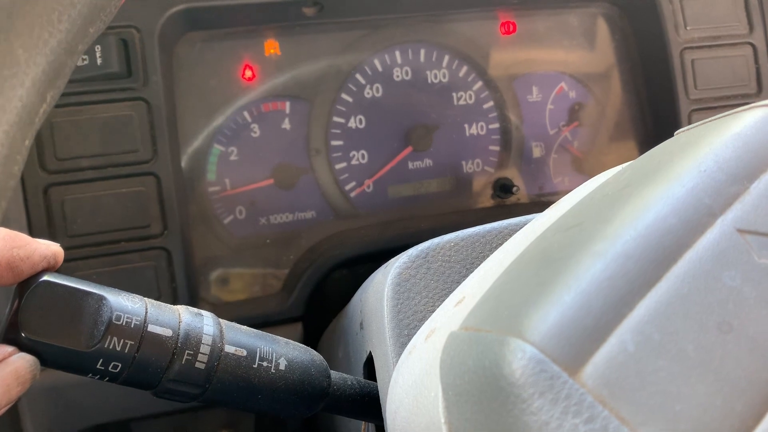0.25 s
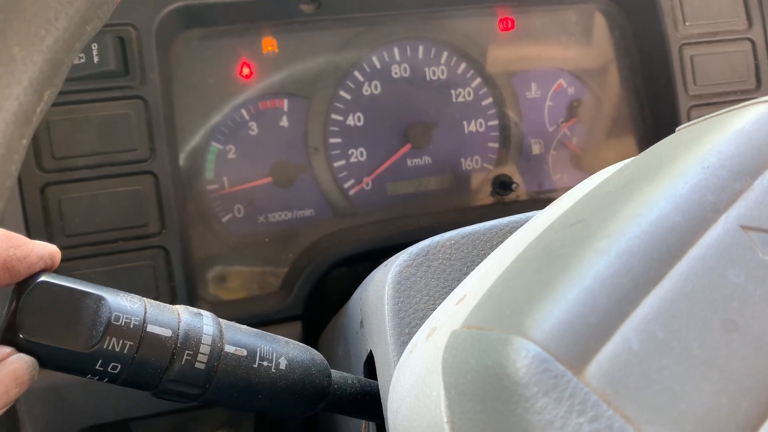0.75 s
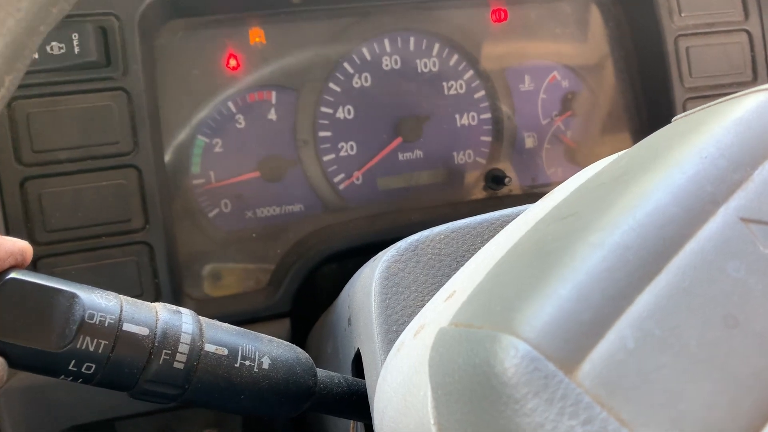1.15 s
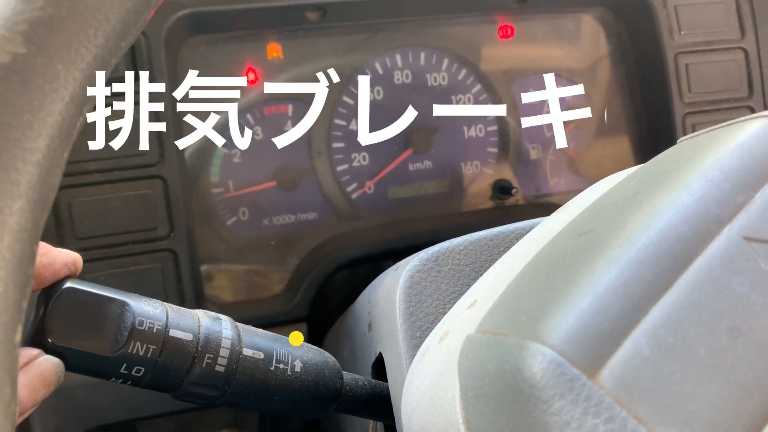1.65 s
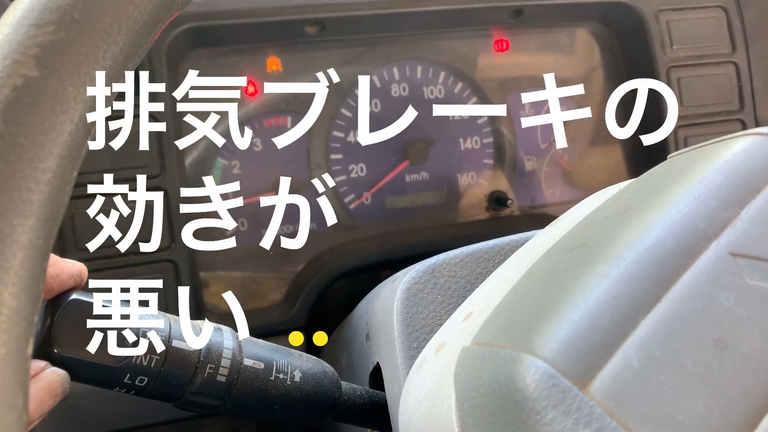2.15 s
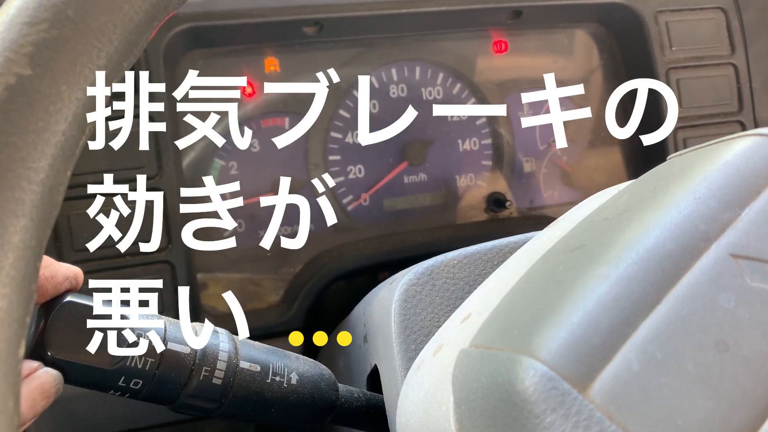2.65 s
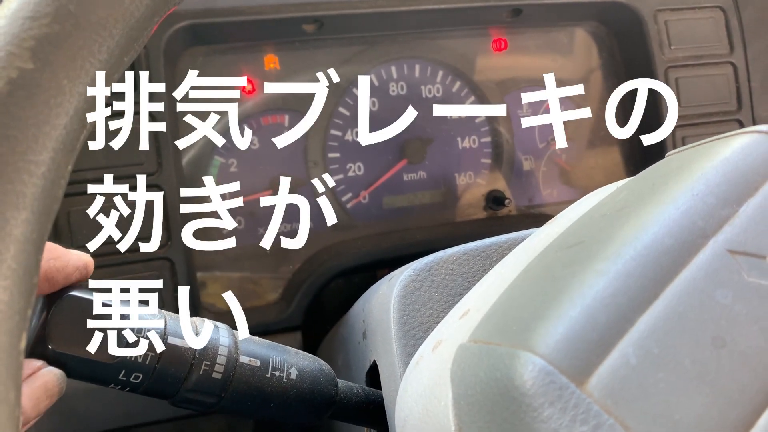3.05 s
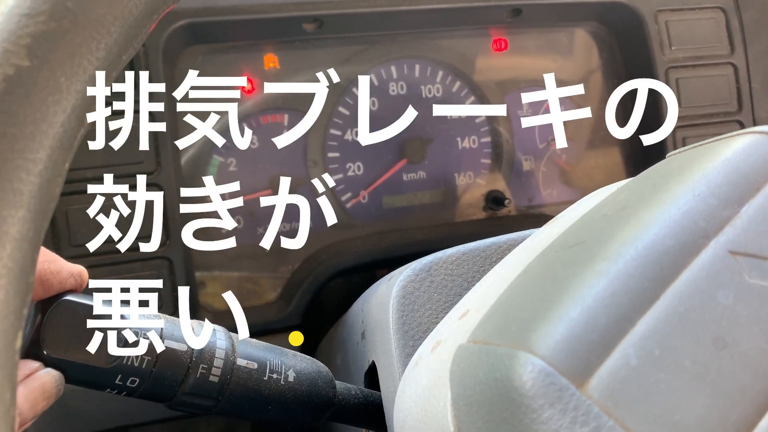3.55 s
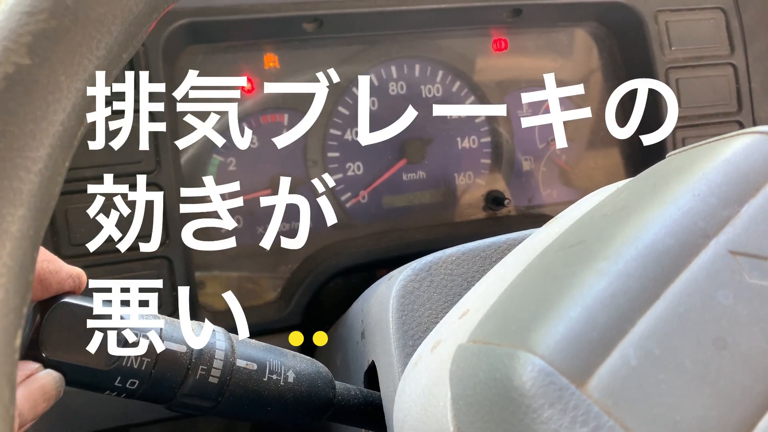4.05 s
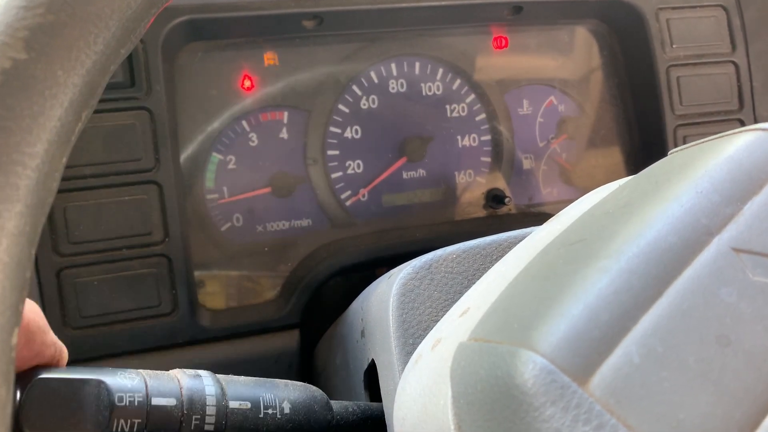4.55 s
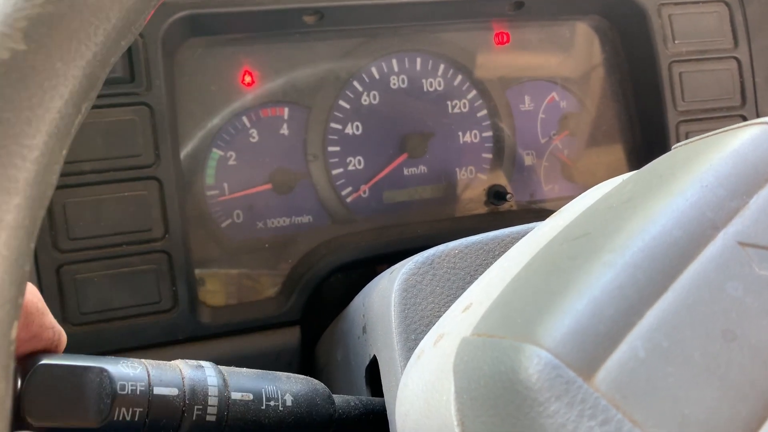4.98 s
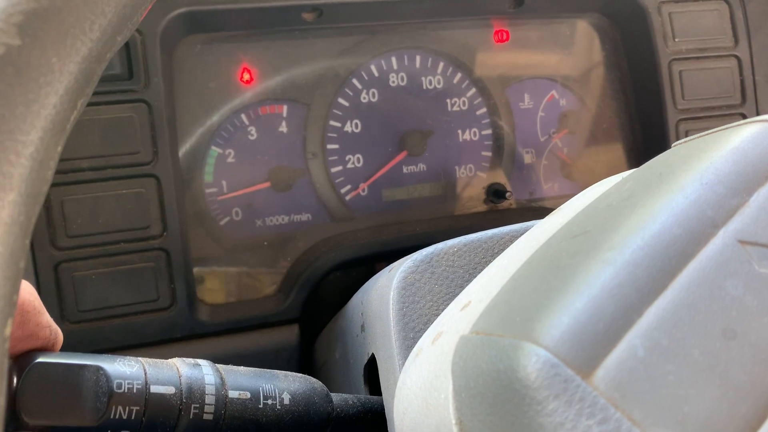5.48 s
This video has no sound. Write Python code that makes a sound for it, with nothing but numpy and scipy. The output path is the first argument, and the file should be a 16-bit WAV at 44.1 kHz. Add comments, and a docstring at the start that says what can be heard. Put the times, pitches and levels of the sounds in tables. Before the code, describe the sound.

Inside a parked diesel truck cab, the engine idles with its exhaust brake shut: a steady low boom, knocking, clatter and a thin whistling air leak. One faint tap comes midway. Late on, a quick burst of compressed air vents, the boom and hiss fall away, and the engine eases to a slower, softer, slightly crackling idle. Close stereo microphone in the cab.

```python
"""Diesel truck letting go of its exhaust brake

A four-cylinder diesel idles, heard in its cab, with the exhaust brake shut: tones tied to the firings
boom, filtered clicks knock, shaped noise clatters and steady tones hum. Noise hisses and whistles as
air at the brake valve. A faint tap, then the air vents in a puff and the brake opens: boom and hiss
die away and the engine, with a sharper crack, settles to a slower, softer idle."""
import sys
import numpy as np
from scipy import signal
from scipy.fft import rfft, irfft, next_fast_len
from scipy.io import wavfile
from scipy.ndimage import uniform_filter1d

SR = 44100
rng = np.random.default_rng(int(sys.argv[2]) if len(sys.argv) > 2 else 0)


def persist_wave(psi):
    """Save psi, clipped to +-1, as 16-bit WAV."""
    counts = np.round(np.clip(psi, -1, 1) * 32767).astype(np.int16)
    wavfile.write(sys.argv[1], SR, np.atleast_2d(counts).T)


N = 252252

# Block and cab panels that ring: (pitch [Hz], width of one filter pass [Hz],
# level of a knock harmonic there with the brake shut [dB rms])
PANELS = [(358, 50, -48), (410, 50, -49), (442, 36, -45), (498, 30, -56), (575, 40, -48), (615, 56, -48.5),
          (716, 30, -48.5), (878, 40, -52), (1010, 110, -61), (1135, 60, -61), (1300, 70, -64),
          (1485, 50, -59), (1570, 50, -58), (1800, 180, -62), (2520, 130, -72)]

FIRST_S = 0.0192  # first firing
BRAKED_HZ, FREE_HZ = 27.515, 23.6  # firings per second, brake shut and free idle
OPEN_S = 4.605  # the brake flap starts to open
FLAP_S, SETTLE_S, PIPE_S = 0.028, 0.14, 0.12  # time constants: flap, governor, pipe emptying
SAG_PER_S = 0.031  # the back pressure slackens slowly while the brake is held
STRONG_TURN = 1.6  # place in the four-firing cycle where the beat swells most (firing gaps)

VENT_S, ATTACK_S, HOLD_S = 4.546, 0.021, 0.03  # puff: start, rise of the hiss, full flow
WHISTLE_ATTACK_S = 0.028  # the whistle builds more slowly
LEAK_DB, PUFF_DB, REST_DB = -42, -33.5, -64.5  # rough hiss level: leak, full puff, empty line
LEAK_WHISTLE_DB, PUFF_WHISTLE_DB = -47, -28  # rough whistle level: leak, full puff
HISS_FALL_DB_S, WHISTLE_FALL_DB_S = 170, 152  # release of the puff (dB per s)
DRAIN_DB_S2 = 157  # the leak fades ever faster as the line empties (dB per s squared)

CRACK_HZ, CRACK_WIDTH_HZ = 2950, 280
CRACK_DB = -77  # level of a crack harmonic at the settled idle


def amp(db):
    """Gain of a level in dB."""
    return 10 ** (np.asarray(db) / 20)


def read(points, hz):
    """Value of a spectrum table, in straight lines on a log-frequency axis."""
    f, value = np.transpose(points)
    return np.interp(np.log(hz + 1), np.log(f + 1), value)


def noise(points):
    """Two unrelated noises with a density given in dB per Hz."""
    gain = amp(read(points, np.fft.rfftfreq(N, 1 / SR))) * np.sqrt(SR / 2)
    return irfft(rfft(rng.standard_normal((2, N))) * gain, N)


def resonate(x, hz, width):
    """Ringing at one pitch: a resonance with a gain of about 1 at its centre."""
    r = np.exp(-np.pi * width / SR)
    turn = np.exp(2j * np.pi * hz / SR)
    return 2 * signal.lfilter([1 - r], [1, -r * turn], x).real


def wobble(seconds):
    """Slow random drift of rms 1: noise averaged twice over the given time."""
    x = rng.standard_normal(N)
    for _ in range(2):
        x = uniform_filter1d(x, int(seconds * SR))
    return x / x.std()


def firings(rate, scatter_db, delay, spread_s, order=0):
    """One soft click per firing, scaled to about rms 1 per low harmonic; delay in firing gaps."""
    # Relative strength in firing order: (strength [dB])
    cylinder_db = [-5.5, -3, -11, 1]
    at = np.flatnonzero(np.diff(np.floor(np.cumsum(rate) / SR - delay)))
    chance = rng.standard_normal((len(at), 2))
    strength_db = np.resize(np.roll(cylinder_db, order), len(at)) + scatter_db * chance[:, 0]
    late = (spread_s * SR * chance[:, 1]).astype(int)
    clicks = np.zeros(N)
    clicks[np.clip(at + late, 0, N - 1)] = amp(strength_db) * SR / rate[at] / np.sqrt(2)
    return signal.sosfilt(signal.butter(4, 3200, fs=SR, output="sos"), clicks)


def controls():
    """Firing rate, brake closure and pipe pressure: the flap snaps open, the speed eases down."""
    t = np.arange(N) / SR
    since = np.maximum(t - OPEN_S, 0)
    held = 1 - SAG_PER_S * t
    # settles without overshoot
    rate = FREE_HZ + (BRAKED_HZ - FREE_HZ) * (1 + since / SETTLE_S) * np.exp(-since / SETTLE_S)
    shut = held * np.exp(-since / FLAP_S)
    pressure = held * np.exp(-(since / PIPE_S) ** 2)
    return rate, shut, pressure


def beat(turns, shut):
    """Low exhaust tones locked to the firings; unequal cylinders add fractions of the firing rate."""
    # Tones: (multiple of the firing rate, level with the brake shut [dB rms],
    # level over its group in swell_points with the brake open [dB])
    tones = [(1, -36.5, -14), (2, -20.2, 0), (3, -34, 0), (4, -39.5, -12), (1.25, -60, -30),
             (1.5, -51, -30), (1.75, -41.5, -17), (2.25, -50, -19), (2.5, -48, -17), (2.75, -50, -20),
             (3.25, -58, -25), (3.5, -58, -25), (3.75, -57, -25), (4.25, -56, -10), (4.5, -57, -12),
             (4.75, -57, -10), (5, -46, -1), (5.25, -48, -8), (5.5, -55, -3), (5.75, -58, -6), (6, -48, -1),
             (6.25, -53, -14), (6.5, -55, -14), (6.75, -53, -12), (7, -49, -4), (7.25, -46, -12),
             (7.5, -52, -12), (7.75, -51, -10), (8, -45, -3), (8.25, -53, -11), (8.5, -56, -11),
             (9, -60, -12), (10, -52, -12), (11, -49, -12), (12, -45, -12)]
    # With the brake open the beat swells and dips unevenly:
    # (time [s], low group [dB rms], middle group [dB rms], high group [dB rms])
    swell_points = [(4.64, -40, -43, -44), (4.7, -33, -37, -41), (4.77, -36, -41, -45),
                    (4.83, -30, -37, -49), (4.885, -41, -34, -49), (4.94, -28, -36, -35),
                    (4.985, -39, -40, -47), (5.08, -31, -31, -38), (5.16, -35, -34, -47),
                    (5.21, -41, -34, -43), (5.27, -26, -33, -36), (5.325, -36, -34, -48),
                    (5.385, -29, -37, -41), (5.45, -31, -37, -45), (5.52, -29, -32, -43),
                    (5.565, -37, -38, -51), (5.615, -28, -35, -40), (5.72, -31, -37, -45)]
    s, *levels = np.transpose(swell_points)
    t = np.arange(N) / SR
    low_db, middle_db, high_db = (uniform_filter1d(np.interp(t, s, db), SR // 50) for db in levels)
    out = np.zeros(N)
    for multiple, shut_db, open_db in tones:
        waver_db = (0.6 - 0.5 * shut) * wobble(0.063)  # steadier with the brake shut
        swell_db = low_db if multiple < 2.9 else middle_db if multiple < 4.1 else high_db
        gain = shut * amp(shut_db) + (1 - shut) * amp(open_db + swell_db)
        start = (round(multiple) - multiple) * STRONG_TURN
        if multiple > 3.5:
            start += multiple / 2  # higher tones crest midway between firings
        elif multiple < 3.5 and multiple != 2:
            start += 0.13  # tones beside the cab's boom run ahead
        if multiple > 3 and multiple % 1 > 0:
            start += rng.random()  # the higher fractions keep no common step
        out += np.sqrt(2) * gain * amp(waver_db) * np.cos(2 * np.pi * (multiple * turns + start))
    return out


def hums():
    """Steady tones that keep their pitch while their level drifts."""
    # Tones: (pitch [Hz], level before the drift [dB rms])
    steady_tones = [(58.45, -53.5), (70.6, -44.5), (128.45, -52)]
    t, out = np.arange(N) / SR, np.zeros(N)
    for hz, db in steady_tones:
        level = np.sqrt(2) * amp(db + 0.99 * wobble(0.2))
        out += level * np.sin(2 * np.pi * (hz * t + rng.random()))
    return out


def knocks(rate, pressure):
    """Each combustion blow sets the panels ringing, more softly as the pipe pressure falls."""
    main = firings(rate, 0.8, delay=0.7, spread_s=0.00005)
    # the higher panels ring later and sit nearer another cylinder
    block = firings(rate, 0.8, delay=0.87, spread_s=0.00005, order=2)
    # valves seat about midway between firings
    valves = firings(rate, 2.0, delay=0.21, spread_s=0.0001)
    eased = amp(-10.0 * (1 - pressure))
    out = np.zeros((2, N))
    for hz, width, db in PANELS:
        blow = block if hz > 520 else main
        if hz > 700:
            blow = blow + 0.44 * valves
        ring = amp(db) * resonate(resonate(blow * eased, hz, width), hz, width)
        # a blow reaches each of the two spots by its own path, under 2 ms long
        for spot, lag in enumerate(rng.integers(0, SR // 500, 2)):
            out[spot] += np.roll(ring, lag)
    return out


def clatter(turns, pressure):
    """Mechanical noise and trapped-gas noise, coloured by the panels and pulsing with the firings."""
    # Mechanical noise before panels and pulsing: (frequency [Hz], density [dB per Hz])
    mechanical = [(30, -72), (50, -63), (70, -67), (85, -71), (140, -64), (200, -68), (235, -76),
                  (270, -71), (450, -71), (620, -78), (1250, -75.5), (1380, -77.5), (1500, -75.5),
                  (1700, -77), (1850, -78), (2400, -81), (4300, -83), (5300, -88.5), (6500, -89),
                  (8700, -96.5), (13000, -102), (16000, -116)]
    # Trapped gas at full pressure, before panels and pulsing: (frequency [Hz], density [dB per Hz])
    trapped_gas = [(35, -86), (55, -55), (72, -53), (100, -75.5), (200, -54.5), (290, -72.5), (400, -71.5),
                   (550, -71), (750, -74), (900, -71.5), (1500, -91), (2500, -95.5), (4000, -93.5)]
    chuff = amp(1.7 * np.cos(2 * np.pi * (turns - 0.38)))  # the gas surges once a firing
    rattle = noise(mechanical) + pressure * chuff * noise(trapped_gas)
    # each panel swells and fades on its own
    coloured = np.zeros((2, N))
    for hz, width, db in PANELS:
        share = 1.15 if hz > 1250 else 0.85
        panel_db = (4 if hz > 1400 else 2.5) * wobble(0.035)
        coloured += share * resonate(rattle, hz, 0.5 * width) * amp(panel_db)
    twice = 0.47 * np.cos(2 * np.pi * (2 * turns - 0.65))
    once = 0.63 * np.cos(2 * np.pi * (turns - 0.33))
    return (rattle + coloured) * amp(twice + once)


def flow(leak_db, puff_db, fall_db_s, attack_s):
    """Air gain and puff strength 0-1: a leak that drains after venting, and a puff that rises and falls."""
    since = np.maximum(np.arange(N) / SR - VENT_S, 0)
    after = np.maximum(since - ATTACK_S - HOLD_S, 0)
    puff = np.minimum(since / attack_s, 1) ** 2 * amp(puff_db - fall_db_s * after)
    leak = amp(leak_db - DRAIN_DB_S2 * after ** 2)
    return np.hypot(leak, puff), puff / amp(puff_db)


def air():
    """A jet of compressed air: wide turbulent hiss and a fuzzy whistle of the valve cavity."""
    # Spectrum of the hiss, shape only: (frequency [Hz], relative density [dB])
    jet_shape = [(600, -47), (2000, -3), (4000, 2), (6000, -1.5), (10000, -2), (12500, -2), (16000, 3)]
    # Tones that the strong flow wakes: (pitch [Hz], width [Hz], gain on the jet at full puff [dB])
    cavity_tones = [(1610, 100, 14), (2870, 170, 7), (4350, 210, -6), (4870, 290, 6.5), (5280, 190, 1.5),
                    (6260, 380, 4.5), (9550, 480, 11.5), (10780, 700, 10.5)]
    hiss_gain, strong = flow(LEAK_DB, PUFF_DB, HISS_FALL_DB_S, ATTACK_S)
    whistle_gain, _ = flow(LEAK_WHISTLE_DB, PUFF_WHISTLE_DB, WHISTLE_FALL_DB_S, WHISTLE_ATTACK_S)
    jet = noise(jet_shape)
    whistle = resonate(resonate(rng.standard_normal((2, N)), 7850, 450), 7950, 550)
    cavity = sum(amp(db) * resonate(jet, hz, width) for hz, width, db in cavity_tones)
    top = signal.sosfilt(signal.butter(4, 12500, "high", fs=SR, output="sos"), jet)
    low = signal.sosfilt(signal.butter(4, 12500, fs=SR, output="sos"), jet)
    # band-passed part of the jet, 2000 to 3700 Hz, partly subtracted at strong flow
    mid_band = signal.sosfilt(signal.butter(1, [2000, 3700], "band", fs=SR, output="sos"), jet)
    # the puff loses some of the top
    hiss = low + amp(-8.0 * strong) * top + np.sqrt(strong) * (cavity - 0.55 * mid_band)
    hiss_level = (hiss_gain + amp(REST_DB)) * amp(1.4 * wobble(0.026))
    whistle_level = whistle_gain * amp(1.35 * wobble(0.058))
    return hiss_level * hiss / jet.std() + whistle_level * whistle / whistle.std()


def stalk_tap():
    """A faint tap on the stalk: bright noise that dies away within milliseconds."""
    # Taps: (time [s], starting level of the noise [dB])
    taps = [(3.5812, -30)]
    t, out = np.arange(N) / SR, np.zeros(N)
    bright = np.diff(rng.standard_normal(N + 2), 2) / np.sqrt(6)
    for s, db in taps:
        out += amp(db) * bright * (t > s) * np.exp(-abs(t - s) / 0.0008)
    return out


def crack(rate, pressure):
    """Sharp edge of combustion once the exhaust runs free, fading as the speed settles."""
    clicks = firings(rate, 1.1, delay=0.68, spread_s=0.0008)
    freed = (1 - pressure) ** 4 * amp(4.4 * (rate - FREE_HZ))
    return amp(CRACK_DB) * resonate(clicks * freed, CRACK_HZ, CRACK_WIDTH_HZ)


def scene():
    """Sum of all sources; each row is the sound at one of two unrelated spots in the cab."""
    rate, shut, pressure = controls()
    turns = np.cumsum(rate) / SR - FIRST_S * rate[0]  # firings counted from the first
    engine = beat(turns, shut) + hums() + knocks(rate, pressure) + clatter(turns, pressure)
    return engine + air() + stalk_tap() + crack(rate, pressure)


def record(dry):
    """Left and right: the right shares the left's sound, phase-shifted, plus some of its own; treble cut."""
    # Share of the left's sound in the right: (frequency [Hz], share [0-1])
    likeness = [(30, 0.4), (60, 0.87), (250, 1), (420, 0.81), (560, 0.57), (800, 0.5), (2000, 0),
                (5000, 0.09), (6800, 0.42), (8600, 1), (9700, 0.9), (11000, 0.88), (12200, 1),
                (13300, 0.86)]
    # Phase by which the left leads: (frequency [Hz], lead [radians])
    lead = [(0, 0.5), (110, 1.53), (262, 3), (400, 5.5), (1000, 3.5), (1500, 4), (2100, 7), (2600, 8),
            (3300, 6.5), (3900, 8), (5100, 2.5), (6300, 6), (8600, 2.5), (15800, -5.5)]
    # Left level minus right level: (frequency [Hz], difference [dB])
    balance = [(60, 0.5), (130, -1.5), (290, 1.5), (640, -1.5), (1410, -1.5), (3100, -1.5), (6820, -1.5),
               (15000, 1)]
    size = next_fast_len(N + 4096)
    hz = np.fft.rfftfreq(size, 1 / SR)
    near, other = rfft(dry, size)
    same = np.clip(read(likeness, hz), 0, 1)
    tilt = amp(read(balance, hz) / 2)
    right = same * near + 1j * np.sqrt(1 - same ** 2) * other
    right = right * np.exp(-1j * np.interp(hz, *np.transpose(lead)))
    pair = irfft(np.array([near * tilt, right / tilt]), size)[:, :N]
    lowpass = signal.firwin(1023, 15750, window=("kaiser", 10), fs=SR)  # cutoff in Hz
    return signal.oaconvolve(pair, lowpass[None], "same")


dry = scene()
out = record(dry)
persist_wave(out)
```